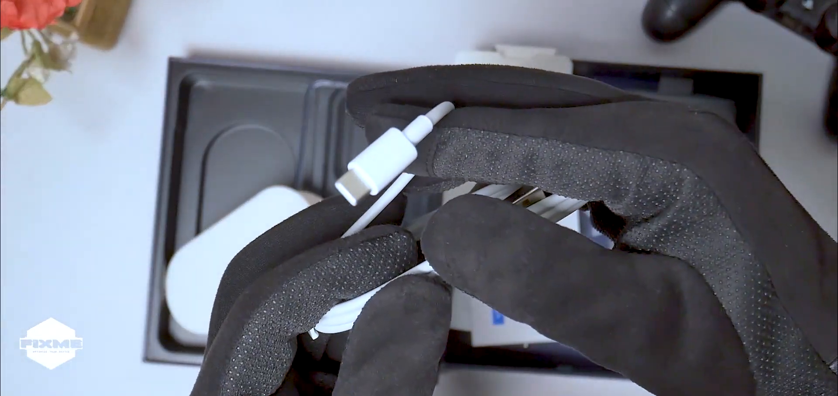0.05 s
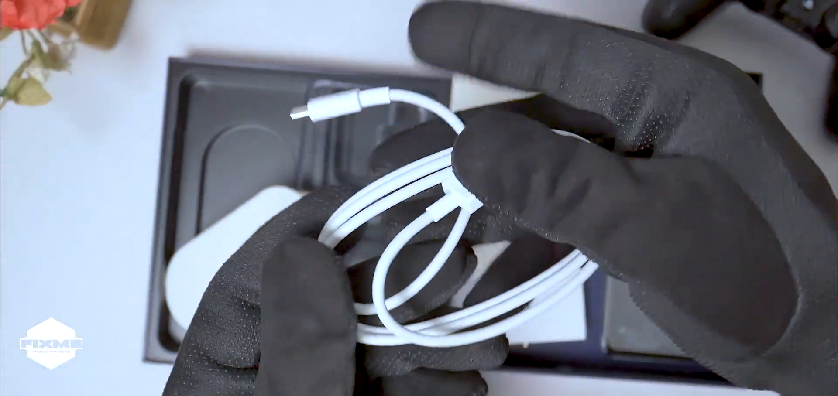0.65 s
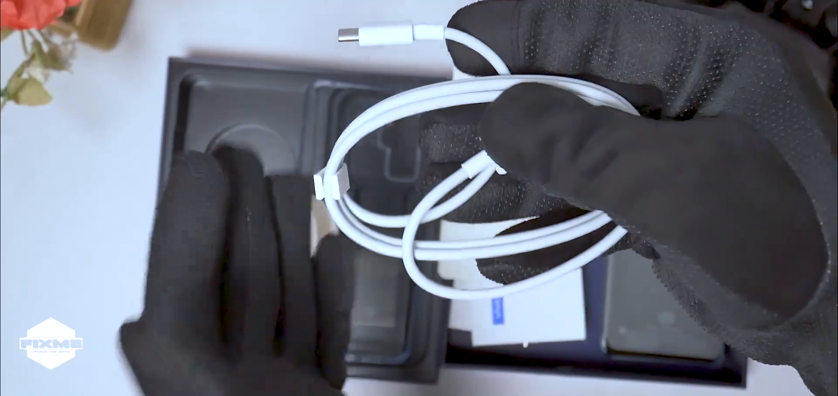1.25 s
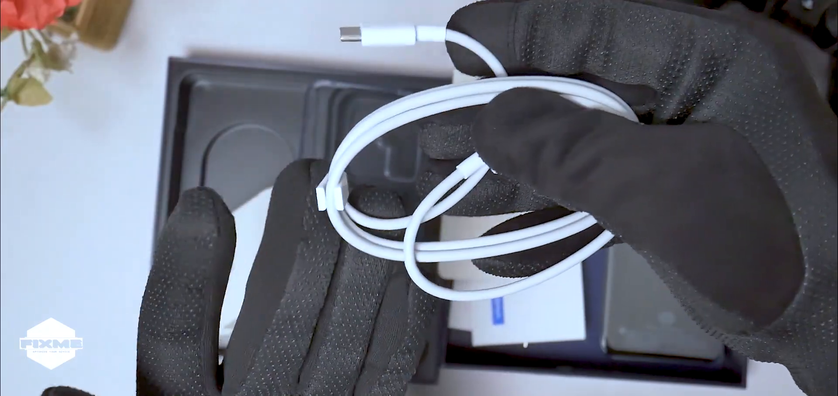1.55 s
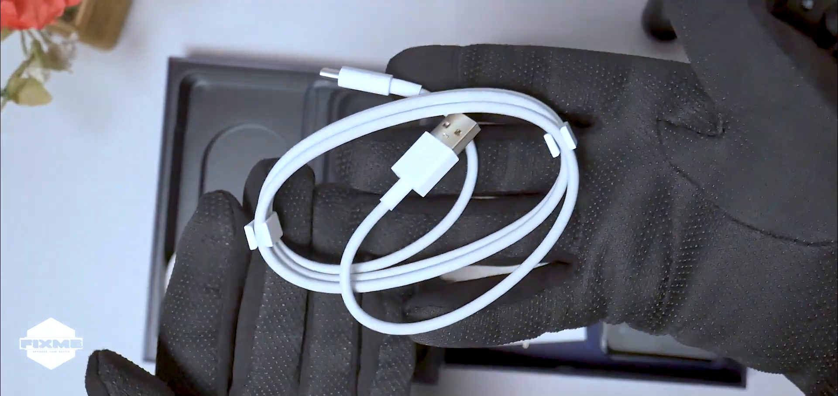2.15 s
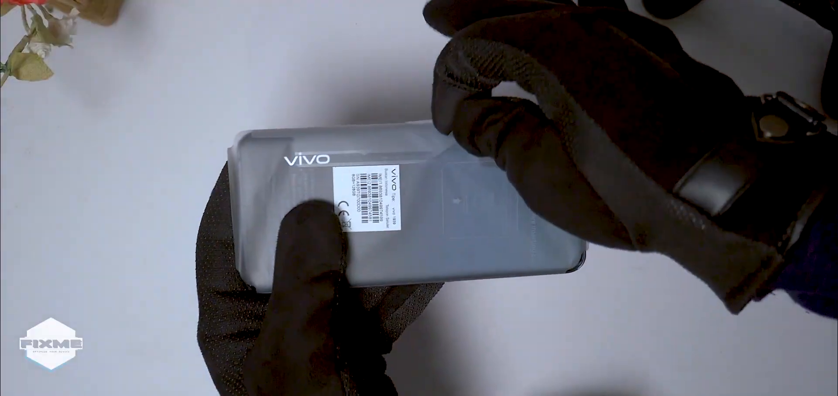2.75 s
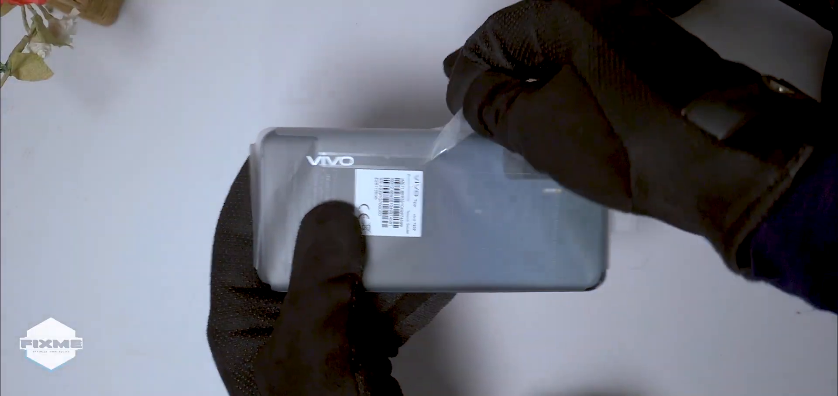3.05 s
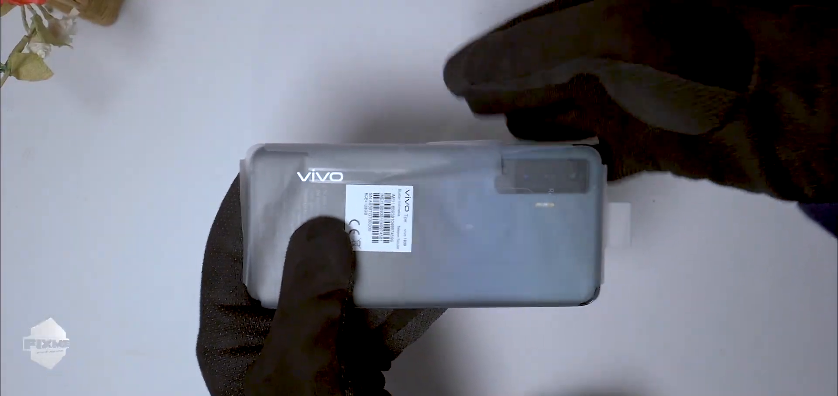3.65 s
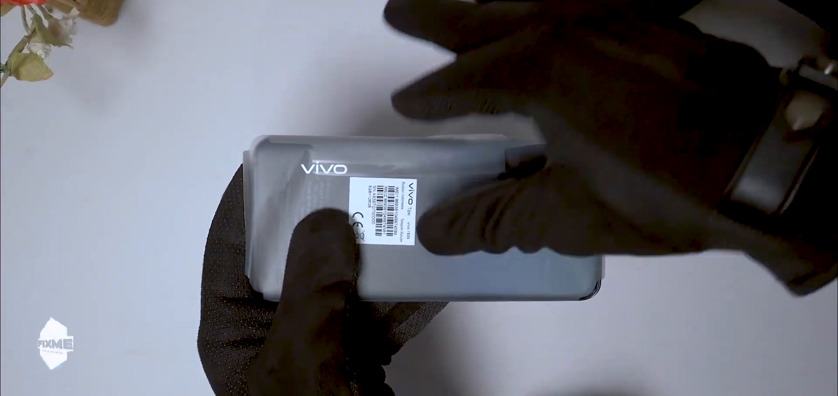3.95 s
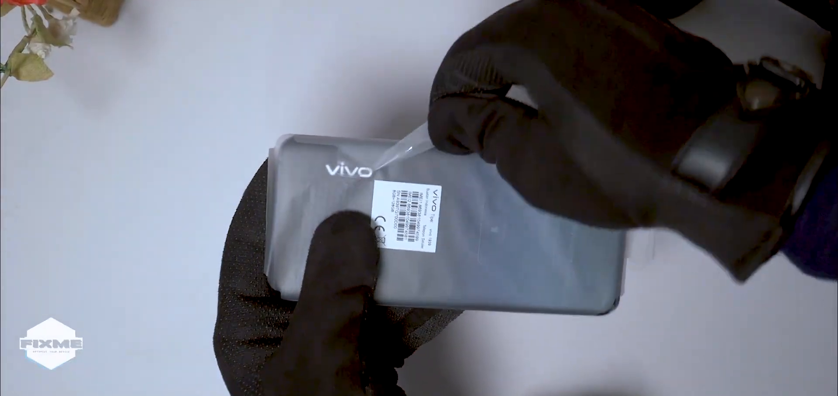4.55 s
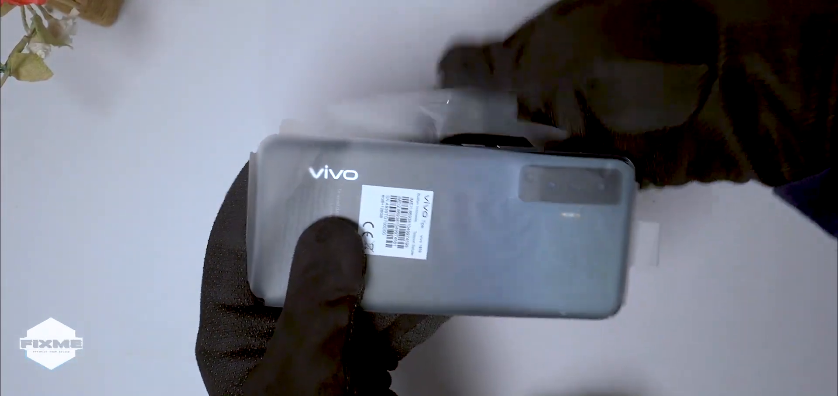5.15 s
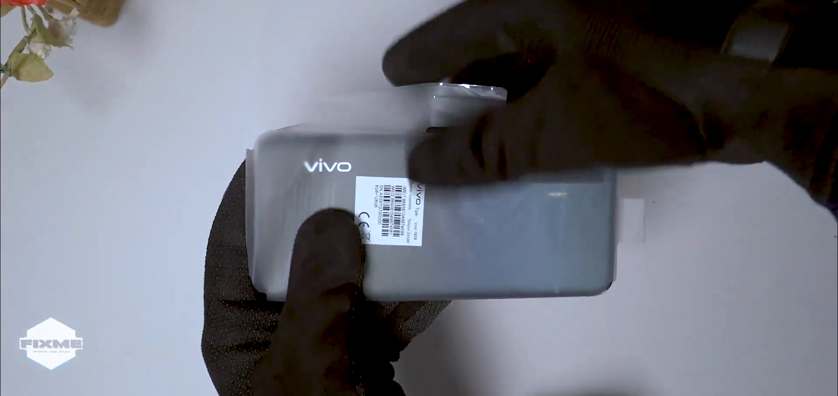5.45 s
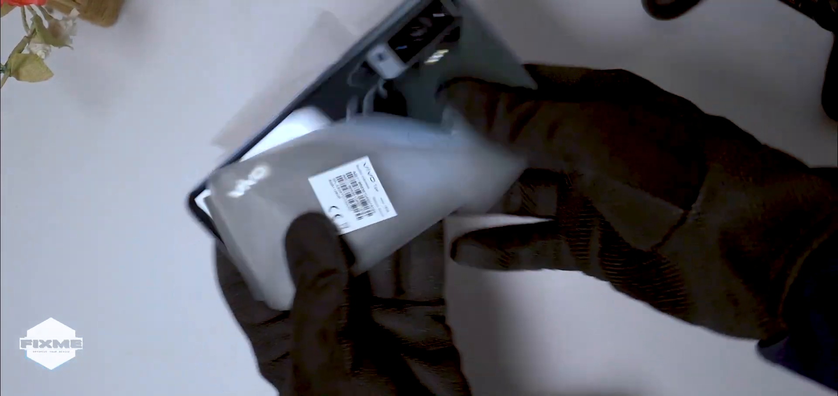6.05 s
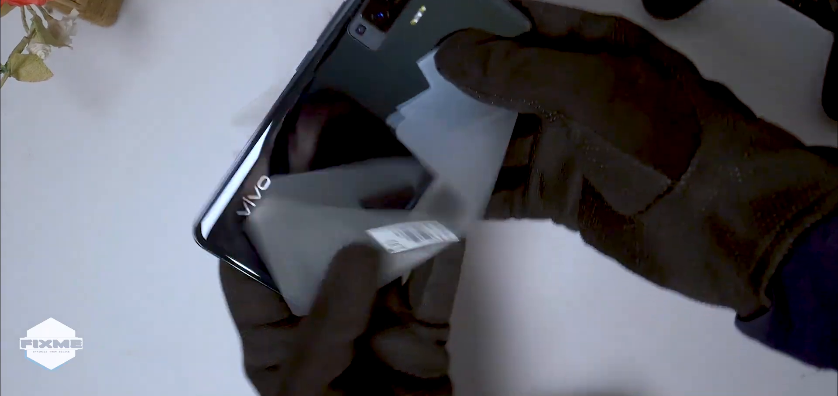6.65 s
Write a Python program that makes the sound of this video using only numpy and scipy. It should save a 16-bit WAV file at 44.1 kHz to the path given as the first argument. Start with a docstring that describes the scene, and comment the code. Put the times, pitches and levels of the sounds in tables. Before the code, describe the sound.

Gloved hands softly handle a cable, then peel thin plastic film off a phone with close crinkles, sharp crackles and dull knocks.

```python
"""Peeling plastic wrap off a device

Close to the microphone, gloved hands turn a coiled cable over a desk, then peel a thin film off a device.
The film comes away in tugs that swell, rustle and fade, and its creases buckle in very short snaps.
The device knocks dully in the grip, and the desk bounces each snap straight back.
Behind it all lies a small, quiet room with a low hum."""
import sys
import numpy as np
from scipy import signal
from scipy.fft import rfft, irfft
from scipy.io import wavfile
from scipy.ndimage import uniform_filter1d, minimum_filter1d

SR = 44100
rng = np.random.default_rng(int(sys.argv[2]) if len(sys.argv) > 2 else 0)


def master(y):
    """Save y as 16-bit WAV."""
    cut = np.clip(np.atleast_2d(y).T, -1, 1)
    pcm = np.round(cut * 32767)  # scale
    wavfile.write(sys.argv[1], SR, pcm.astype(np.int16))


N = 304731
TIME = np.arange(N) / SR

# All levels in the tables are relative: the functions turn them up or down further.
# The tone of each noise. Each row: frequency in Hz, level in dB.
ROOM_SPECTRUM = [(15, -57), (25, -36), (44, -16), (66, -3), (87, -14), (145, -1), (190, -13), (229, -10),
                 (344, -19), (439, -20.5), (863, -29.5), (2220, -33.5), (2840, -38.5), (11000, -43.5),
                 (16000, -55)]
GLOVE_SPECTRUM = [(150, -2.5), (500, -2), (1200, -11.5), (2050, -0.5), (2900, -2), (4300, -0.5), (5300, -9),
                  (7500, -8), (11000, -6), (16000, -9.5)]
GRIP_SPECTRUM = [(35, -34), (90, -3.5), (240, -6), (400, -7.5), (750, -14), (1400, -20), (4000, -40.5)]
RUSTLE_SPECTRUM = [(200, -39), (600, -4), (1000, -8.5), (1900, -0.5), (2800, -2.5), (4200, -1), (6000, -14),
                   (12000, -45)]
HISS_SPECTRUM = [(1500, -28.5), (3500, -12), (5200, -8), (8000, -4), (12500, -1.5), (16000, -3)]
# How alike left and right are. Each row: frequency in Hz, likeness from 0 (unrelated) to 1 (the same).
ROOM_TONE_LIKENESS = [(40, 0.8), (120, 0.8), (300, 0.4), (700, 0.22), (3000, 0.2), (7000, 0), (15000, .2)]
CLOSE_LIKENESS = [(50, 0.8), (250, 0.92), (700, 0.92), (3000, 1), (5000, 0.8), (7500, 0.06), (15000, 1)]
# How long the room rings. Each row: frequency in Hz, seconds to fade by 60 dB.
ROOM_DECAY = [(200, 0.47), (1000, 0.15), (4000, 0.21), (14000, 0.098)]
# A deep tone swells and fades. Each row: time in seconds, level in dB.
DRONE_LEVELS = [(1.0, -84), (1.5, -78), (1.95, -69), (2.28, -70), (2.42, -84)]
# Gloves stroke the cable. Each row: middle in seconds, length in seconds, level in dB.
GLOVE_STROKES = [(0.378, 0.12, -61.5), (0.599, 0.12, -64.5), (0.865, 0.13, -62.5), (0.96, 0.11, -64.5),
                 (1.057, 0.065, -64), (1.214, 0.072, -65), (1.283, 0.033, -62.5), (1.461, 0.087, -67.5),
                 (1.528, 0.044, -67.5), (1.808, 0.12, -65), (1.912, 0.11, -67), (2.028, 0.036, -71.5),
                 (2.067, 0.03, -70), (2.456, 0.41, -77)]
# Soft taps of cable and fingers. Each row: start in seconds, level in dB, pitch in Hz.
CABLE_TAPS = [(0.39, -45.5, 824), (0.851, -35.5, 612), (1.056, -52, 480), (1.222, -58, 1460),
              (1.282, -46.5, 1970), (1.445, -53.5, 2030), (2.837, -47, 2270), (4.942, -39, 1040),
              (4.969, -48.5, 1370), (5.067, -52.5, 560), (6.113, -34, 920), (6.579, -37.5, 615)]
# The device shifts in the grip. Each row: middle in seconds, length in seconds, level in dB.
GRIP_RUBS = [(3.109, 0.058, -55.5), (3.613, 0.036, -60), (3.674, 0.027, -45.5), (4.612, 0.019, -55.5),
             (4.782, 0.066, -60.5), (4.879, 0.042, -43), (5.061, 0.031, -49.5), (5.129, 0.024, -51.5),
             (5.216, .06, -40), (5.596, 0.056, -44.5), (5.713, 0.081, -49.5), (5.988, 0.034, -49.5),
             (6.031, 0.039, -36.5), (6.088, 0.069, -43.5), (6.153, 0.022, -47), (6.203, 0.022, -43),
             (6.222, 0.016, -36.5), (6.253, 0.018, -48), (6.327, 0.03, -45.5), (6.369, 0.071, -45),
             (6.593, 0.023, -46.5), (6.806, 0.019, -45), (6.862, 0.026, -42)]
# Hollow bumps of the device and loose film. Each row: start in seconds, level in dB, pitch in Hz.
DEVICE_BUMPS = [(4.7273, -41, 193), (4.7409, -27.5, 226), (4.878, -53, 170), (4.926, -38, 201),
                (5.071, -36, 272), (5.197, -34.5, 210), (5.572, -30, 256), (5.59, -21, 228),
                (5.615, -32.5, 250), (5.681, -29, 336), (5.787, -35, 333), (5.955, -31.5, 222),
                (6.021, -26, 225), (6.108, -26, 290), (6.2203, -19.5, 228), (6.251, -31, 300),
                (6.363, -27.5, 226), (6.801, -21, 306), (6.857, -25, 240)]
# Stretched film slips over the edge of the casing.
# Each row: middle in seconds, length in seconds, ring level in dB, hiss level in dB, pitch in Hz.
FILM_RASPS = [(2.494, 0.18, -76.5, -74, 2770), (3.354, 0.21, -67, -66.5, 3000),
              (5.032, 0.014, -52.5, -63.5, 1550), (5.082, 0.021, -44, -38, 2570),
              (5.151, 0.05, -54, -52.5, 2520)]
# Film drags on the casing, harder once it hangs loose. Each row: time in seconds, level in dB.
FILM_DRAG = [(2.66, -87.5), (2.78, -77.5), (3.2, -69.5), (3.43, -81), (3.51, -91), (4.05, -81.5),
             (4.22, -79), (4.66, -68.5), (5.0, -79), (5.53, -86.5), (5.66, -69.5), (5.88, -67), (6.1, -65),
             (6.55, -59), (6.75, -54.5), (6.9, -53)]
# Tugs at the film. Each row: peak time in seconds, swell time in seconds, rustle in dB, hiss in dB.
FILM_TUGS = [(3.066, 0.056, -71.5, -57.5), (3.108, 0.03, -49, -44.5), (3.571, 0.028, -54, -56.5),
             (3.612, 0.017, -51, -50.5), (3.666, 0.047, -44.5, -42.5), (4.069, 0.0077, -62.5, -55.5),
             (4.16, 0.044, -55.5, -50), (4.256, 0.037, -52, -49.5), (4.323, 0.014, -58, -39.5),
             (4.394, 0.0038, -61, -41), (4.74, 0.0072, -46, -58.5), (4.852, 0.014, -40, -33),
             (4.931, 0.014, -54.5, -53.5), (5.04, 0.023, -55.5, -51), (5.168, .022, -42, -27.5),
             (5.214, 0.064, -34.5, -34.5), (5.568, .012, -46.5, -47.5), (5.596, 0.017, -40.5, -41.5),
             (5.69, 0.036, -51, -48), (5.744, 0.13, -47, -50.5), (5.787, 0.011, -61, -77),
             (5.924, 0.013, -54, -76), (6.021, 0.017, -33, -34), (6.091, 0.061, -41, -37.5),
             (6.156, 0.022, -42, -43.5), (6.2, .02, -51.5, -63), (6.222, 0.022, -45.5, -48.5),
             (6.254, 0.019, -53, -55.5), (6.314, .008, -46, -47.5), (6.38, 0.04, -52, -68),
             (6.677, 0.037, -47.5, -45), (6.799, 0.015, -46, -51), (6.865, 0.03, -48.5, -48)]
# Creases buckle. Each row: start in seconds, levels in dB of ring, tick, flex and air push, pitch in Hz.
CREASE_SNAPS = [(3.0816, -27, -34, -33, -45, 2760), (3.0853, -46, -35, -47, -70, 4600),
                (3.184, -71, -56, -73, -85, 5500), (3.4519, -45.5, -37.5, -84, -58, 3100),
                (3.5313, -42, -52, -68, -74, 2800), (3.572, -37, -40.5, -73, -55, 2420),
                (3.6692, -35.5, -28, -41.5, -61, 2550), (3.683, -34.5, -30, -38, -57, 4080),
                (4.2304, -50.5, -54, -62, -70, 1840), (4.251, -29, -35, -80, -86, 4050),
                (4.2655, -40.5, -42, -58, -81, 3760), (4.3114, -42, -31.5, -43, -72, 3800),
                (4.313, -31.5, -50, -77, -67, 3300), (4.3178, -38, -33, -44.5, -70, 4330),
                (4.331, -35, -37.5, -76, -84, 3900), (4.3457, -29.5, -32, -49.5, -69, 4100),
                (4.3558, -42, -30, -59, -77, 4060), (4.3902, -35.5, -19.5, -44.5, -57, 3800),
                (4.61, -48.5, -46, -56.5, -50, 5100), (4.727, -45, -38.5, -42.5, -49, 2550),
                (4.7383, -41.5, -40, -47, -56, 4740), (4.745, -30.5, -22, -40, -55, 3500),
                (4.8298, -35.5, -29, -53, -82, 3220), (4.85, -18.5, -10.5, -21, -27, 2670),
                (4.8612, -48, -31, -32, -39.5, 2700), (4.881, -34.5, -37, -38, -42.5, 3280),
                (4.9251, -41, -36, -38.5, -43.5, 3080), (5.0185, -37.5, -53.5, -47, -54, 2080),
                (5.1253, -42.5, -32.5, -46, -46.5, 2600), (5.1625, -35.5, -30.5, -45.5, -45, 2370),
                (5.183, -46, -28, -37, -46, 3560), (5.189, -30.5, -16.5, -39, -40, 4640),
                (5.2, -38.5, -30.5, -48, -34.5, 3270), (5.221, -36, -33, -36.5, -34.5, 2680),
                (5.2344, -40.5, -38.5, -44.5, -58, 3800), (5.2838, -49, -45.5, -58, -54, 3660),
                (5.31, -61, -53.5, -73.5, -82.5, 5030), (5.566, -52, -46.5, -44, -62, 2770),
                (5.5921, -40.5, -44, -46, -39, 2850), (5.601, -31, -33.5, -41, -61, 3340),
                (5.617, -51, -47, -42, -65, 2680), (5.676, -49, -39.5, -69, -52, 2900),
                (5.6954, -44, -51, -45, -52, 2280), (5.7032, -54, -42.5, -55, -70, 4570),
                (5.787, -55.5, -48.5, -43.5, -51, 2740), (5.8174, -52, -57, -55, -53, 3320),
                (5.924, -48.5, -57, -64, -53, 3080), (5.953, -52.5, -57.5, -51.5, -57.5, 2840),
                (6.02, -34.5, -30, -54, -48, 2120), (6.0242, -27.5, -33, -33.5, -53, 2770),
                (6.0801, -41, -36.5, -43, -36, 2800), (6.094, -36, -38, -37, -47, 3100),
                (6.1522, -38.5, -32.5, -45, -43, 3000), (6.22, -34, -33, -43, -38, 2170),
                (6.2479, -42, -43, -43.5, -38, 4050), (6.2769, -46.5, -39.5, -43, -57, 3500),
                (6.3089, -40.5, -37.5, -55, -53, 2080), (6.3108, -41, -31.5, -44.5, -56, 2100),
                (6.385, -48, -48, -50, -64, 2230), (6.409, -52, -44, -64, -60, 4330),
                (6.4263, -49, -54, -59, -51, 2900), (6.5581, -49.5, -50, -45, -64, 2140),
                (6.6425, -39.5, -40.5, -45, -52, 3630), (6.6686, -40.5, -35.5, -45, -48, 3650),
                (6.675, -40.5, -55, -56, -53, 3500), (6.805, -60, -50, -39, -50, 2420),
                (6.835, -46, -66, -50, -47, 3800)]
# How well the microphone hears each pitch. Each row: frequency in Hz, gain in dB.
MIC_RESPONSE = [(1000, 0), (1400, -0.5), (2700, 0), (4000, -1.5), (6000, 3.5), (10000, 1), (13000, -1),
                (15500, -3), (16500, -18)]
# How far the left channel runs ahead of the right. Each row: frequency in Hz, phase in radians.
LEFT_PHASE_LEAD = [(4000, 0.23), (6500, 0.1), (8500, 1.7), (11500, 1), (14000, 2.1)]


def amp(db):
    """Turns decibels into a gain to multiply by."""
    return 10 ** (np.asarray(db) / 20)


def unit(x):
    """Scales a signal so its average strength (rms) is 1."""
    return x / np.sqrt(np.mean(x ** 2) + 1e-20)


def read(points, hz):
    """Looks up a table by frequency, gliding between its rows on a log scale."""
    row_hz, value = np.transpose(points)
    return np.interp(np.log(hz + 1), np.log(row_hz + 1), value)


def level(rows):
    """Gain over time from a table; silent outside it, unless it runs to the end of the scene."""
    times, db = np.transpose(rows)
    after_db = db[-1] if times[-1] > TIME[-1] - .1 else -120
    return amp(np.interp(TIME, times, db, left=-120, right=after_db))


def arch(middle_s, length_s, edge_db=-9, firmness=2):
    """A smooth rise and fall that passes edge_db at both ends; firmer means steeper edges."""
    distance = abs(2 * (TIME - middle_s) / length_s)
    return amp(edge_db * np.minimum(distance ** firmness, 20))


def add(mix, start_s, sound):
    """Adds a sound to the mix at its start time."""
    part = mix[:, round(start_s * SR):][:, :sound.shape[-1]]
    part += sound[..., :part.shape[1]]


def highpass(x, edge_hz, order=2):
    """Turns down everything below edge_hz."""
    return signal.sosfilt(signal.butter(order, edge_hz, "high", fs=SR, output="sos"), x)


def flatten(burst, share=0.7):
    """Evens out the chance peaks and dips in the spectrum of a short burst."""
    spectrum = rfft(burst)
    return irfft(spectrum / (abs(spectrum) + 1e-9) ** share)


def stereo(left, other, likeness):
    """Makes left and right from two unrelated signals; the right borrows some of the left."""
    return np.array([left, likeness * left + np.sqrt(1 - likeness ** 2) * other])


def colour(pair, spectrum, likeness=CLOSE_LIKENESS):
    """Gives a pair of noises a tone and a stereo width."""
    hz = np.fft.rfftfreq(N, 1 / SR)
    channels = stereo(*rfft(pair), read(likeness, hz))
    return unit(irfft(channels * amp(read(spectrum, hz)), N))


def kicks(per_s, spread_db, cap):
    """Spikes at random times, mostly small; the biggest are cap * spread_db above the smallest."""
    sizes = amp(spread_db * np.minimum(rng.exponential(1, N), cap))
    return sizes * (rng.random(N) < per_s / SR)


def slips(per_s, spread_db, smooth, decay_s):
    """The flickering strength of rubbing: tiny uneven slips on top of a smooth share."""
    fade = np.exp(-2 / (decay_s * SR))
    power = signal.lfilter([1], [1, -fade], kicks(per_s, spread_db, cap=4) ** 2)
    return np.sqrt(smooth + (1 - smooth) * power / power.mean())


def friction(grain, spectrum, patchy_db):
    """Noise let out by the slips; its tone keeps shifting as the point of contact moves."""
    bands = signal.stft(rng.standard_normal((2, N)), nperseg=512)[2]
    patches = uniform_filter1d(rng.standard_normal(bands.shape[1:]), size=9, axis=0)  # blur over pitch
    patches = unit(uniform_filter1d(patches, size=5, axis=1))  # blur over time
    noise = signal.istft(bands * amp(patchy_db * patches), nperseg=512)[1][:, :N]
    return colour(grain * noise, spectrum)


def room_tone(rumble_db=-67.5, hum_hz=150, hum_width_hz=26, hum_db=-69.5):
    """Steady rumble and faint hiss, with one low note of the room humming in it."""
    resonance = signal.iirpeak(hum_hz, hum_hz / hum_width_hz, fs=SR)
    hum = signal.lfilter(*resonance, rng.standard_normal(N))
    hum = signal.sosfilt(signal.butter(2, 2 * hum_hz, fs=SR, output="sos"), hum)
    rumble = colour(rng.standard_normal((2, N)), ROOM_SPECTRUM, ROOM_TONE_LIKENESS)
    return amp(rumble_db) * rumble + amp(hum_db) * unit(hum)


def drone(pitch_hz=57.6, waver_hz=1.0):
    """A faint deep tone that wavers a little."""
    waver = unit(uniform_filter1d(rng.standard_normal(N), SR // 5))
    cycles = np.cumsum(pitch_hz + waver_hz * waver) / SR
    return level(DRONE_LEVELS) * unit(np.sin(2 * np.pi * cycles))


def room_echo(sound, echo_db=-19, build_s=0.0079):
    """The room adds a weak wash of echoes, each pitch dying at its own speed."""
    hz, t, bands = signal.stft(rng.standard_normal((2, SR // 2)), SR, nperseg=256)
    bands = stereo(*bands, read(CLOSE_LIKENESS, hz)[:, None])
    fade = amp(-60 * t / read(ROOM_DECAY, hz)[:, None])
    tail = signal.istft(bands * fade, SR, nperseg=256)[1]
    tail *= np.minimum(np.arange(tail.shape[1]) / (build_s * SR), 1)
    return amp(echo_db) * signal.fftconvolve(sound, tail / np.linalg.norm(tail[0]), axes=1)[:, :N]


def gloves(hold_db=-85, hold_end_s=1.55):
    """Fabric scratches over the cable in firm strokes, and stirs faintly while the hands turn it."""
    grain = slips(per_s=450, spread_db=3.3, smooth=0.42, decay_s=.001)
    power = sum((amp(db) * arch(middle_s, length_s, edge_db=-7.5, firmness=1.5)) ** 2
                for middle_s, length_s, db in GLOVE_STROKES)
    power += amp(hold_db) ** 2 * (TIME < hold_end_s)
    return np.sqrt(power) * friction(grain, GLOVE_SPECTRUM, patchy_db=1.8)


def cable_taps(scuff_s=0.0041, scuff_gain=1.78, ring_cycles=4.8, ring_db=-8, clack_hz=2078, clack_db=-3):
    """Each tap is a short scuff, a ring and a plastic clack; high taps die sooner."""
    out, t = np.zeros((2, N)), np.arange(2000) / SR
    scuff_band = signal.butter(3, [500, 3200], "band", fs=SR, output="sos")
    swell = lambda length_s: t / length_s * np.exp(1 - 2 * t / length_s)
    for start_s, db, hz in CABLE_TAPS:
        scuff = signal.sosfilt(scuff_band, rng.standard_normal(len(t))) * swell(scuff_s)
        tones = np.sin(2 * np.pi * hz * t) + amp(clack_db) * np.sin(2 * np.pi * clack_hz * t)
        ring = tones * swell(ring_cycles / hz)
        add(out, start_s, amp(db) * (scuff_gain * scuff + amp(ring_db) * ring))
    return out


def grip_rubs(gain_db=-3, drag_db=-2):
    """The device rubs dully in the hands, when the grip shifts and while the film drags."""
    grain = slips(per_s=420, spread_db=1.2, smooth=0.35, decay_s=0.004)
    power = sum((amp(db) * arch(middle_s, length_s)) ** 2 for middle_s, length_s, db in GRIP_RUBS)
    power += (amp(drag_db) * level(FILM_DRAG)) ** 2
    return amp(gain_db) * np.sqrt(power) * friction(grain, GRIP_SPECTRUM, patchy_db=2.2)


def device_bumps(rise_s=0.0013, decay_s=0.0021, upper_ratio=1.6, upper_db=-6, low_hz=90):
    """Each bump rings two low notes that die at once; the small body gives off no deep bass."""
    out, t = np.zeros((2, N)), np.arange(3000) / SR
    envelope = (1 - np.exp(-t / rise_s)) * np.exp(-t / decay_s)
    for start_s, db, hz in DEVICE_BUMPS:
        lower = np.sin(2 * np.pi * hz * t)
        upper = amp(upper_db) * np.sin(2 * np.pi * (hz * upper_ratio * t + rng.random()))
        add(out, start_s, amp(db) * highpass((lower + upper) * envelope, low_hz))
    return out


def film_rasps(damping_hz=1600):
    """Fast, even slips make the tight film ring around one pitch and hiss until the slipping stops."""
    grain = slips(per_s=800, spread_db=1.5, smooth=0.42, decay_s=.001)
    drive = grain * rng.standard_normal(N)
    hiss = friction(grain, HISS_SPECTRUM, patchy_db=1.5)
    out = np.zeros((2, N))
    for middle_s, length_s, ring_db, hiss_db, hz in FILM_RASPS:
        pole = np.exp(np.pi * (2j * hz - damping_hz) / SR)
        ring = unit(signal.lfilter([1], np.poly([pole] * 3), drive).real)  # three resonators in a row
        out += arch(middle_s, length_s) * (amp(ring_db) * ring + amp(hiss_db) * hiss)
    return out


def crackle(low_hz=1500, high_hz=6000, pitches=16, ring_s=0.00015):
    """Small creases of many pitches flip at random, a few much louder than the rest."""
    flips = kicks(per_s=480, spread_db=3.5, cap=3)
    crease = rng.integers(0, pitches, N)
    out, t = np.zeros(N), np.arange(256) / SR
    for k, hz in enumerate(np.geomspace(low_hz, high_hz, pitches)):
        ring = np.sin(2 * np.pi * hz * t) * t * np.exp(-2 * t / ring_s)
        out += signal.oaconvolve(flips * (crease == k), ring)[:N]
    return unit(out)


def tugs(swell_db=20, fade_db_per_s=340):
    """Gains of rustle and hiss over time: each tug swells at its own pace, and all fade equally fast."""
    power = np.zeros((2, N))
    for peak_s, swell_s, rustle_db, hiss_db in FILM_TUGS:
        near = abs(TIME - peak_s) < .5
        t = TIME[near] - peak_s
        shape = amp(np.minimum(swell_db * t / swell_s, -fade_db_per_s * t))
        power[:, near] += np.outer(amp([rustle_db, hiss_db]), shape) ** 2
    return np.sqrt(power)


def peeling(rustle_db=-2.5, hiss_db=-0.5, crackle_db=-50, half_pull_db=-54, pivot_db=-63):
    """Film drags over the casing: a smooth hiss when slow, grainy and crackling when pulled harder."""
    tug_rustle, tug_hiss = tugs()
    drag = level(FILM_DRAG)
    drag_hiss = amp(pivot_db) * (drag / amp(pivot_db)) ** 0.7  # hiss grows more slowly than rustle
    rustle_gain, hiss_gain = np.hypot(tug_rustle, drag), np.hypot(tug_hiss, drag_hiss)
    pull = rustle_gain / (rustle_gain + amp(half_pull_db))  # 0 at rest, near 1 in a hard tug
    grain = slips(per_s=800, spread_db=4.2, smooth=1 - 0.94 * pull, decay_s=0.0004)
    rustle = rustle_gain * friction(grain, RUSTLE_SPECTRUM, patchy_db=2.6)
    hiss = hiss_gain * friction(grain, HISS_SPECTRUM, patchy_db=1.8)
    return amp(rustle_db) * rustle + amp(hiss_db) * hiss + amp(crackle_db) * pull ** 2 * crackle()


def shiver_and_bounce(sound, shiver_db=-8, shiver_s=0.0028, bounce_db=-13, bounce_s=0.0012):
    """After a snap the loose film shivers for a moment, and the desk bounces the sound back."""
    t = np.arange(700) / SR
    shiver = rng.standard_normal((3, len(t))) * np.exp(-t / shiver_s)
    side_treble = np.diff(shiver[1:], axis=1, prepend=0)  # different on the left and right
    path = amp(shiver_db) * unit(shiver[0] + 0.62 * side_treble) / np.sqrt(len(t))
    path[:, 0] = 1  # the direct sound
    path[:, round(bounce_s * SR * rng.uniform(.8, 1.2))] += amp(bounce_db)
    return signal.fftconvolve(sound, path, axes=1)


def snap(ring_db, tick_db, flex_db, push_db, hz, tick_s=0.00016, level_window_s=0.004):
    """One crease flips: a tiny ring, a bright tick, a lower flex of the film and a push of air."""
    t = np.arange(512) / SR
    at_level = lambda x, db: amp(db) * unit(x) * np.sqrt(level_window_s * SR / len(t))
    ping = lambda pitch_hz, decay_s: np.sin(2 * np.pi * pitch_hz * t) * np.exp(-t / decay_s)
    ring = highpass(t * ping(hz, decay_s=0.00017), 1300)
    flex = highpass(ping(1350 * rng.uniform(0.56, 1.91), decay_s=0.00051), 800)
    burst = rng.standard_normal((3, len(t))) * (1 - np.exp(-t * hz * 2)) * np.exp(-t / tick_s)
    grit = flatten(burst) * np.exp(-t / (4 * tick_s))
    edge_hz = np.clip(6200 * 2 ** ((tick_db + 34) / 45), 3000, 12000)  # harder ticks are brighter
    tick = highpass(grit[0] + 0.38 * grit[1:], edge_hz)  # short waves reach each side differently
    push = highpass(ping(470 * rng.uniform(0.54, 2.1), decay_s=0.0007), 260, order=3)
    body = at_level(ring, ring_db) + at_level(flex, flex_db) + at_level(push, push_db)
    return rng.choice([-1, 1]) * body + at_level(tick, tick_db)


def buckling_creases(gain_db=-0.5, second_db=-6, thin_db=-5, gap_s=0.0015):
    """Each crease gives way in two quick steps; the second is weaker and thinner."""
    out = np.zeros((2, N))
    for start_s, ring_db, tick_db, flex_db, push_db, hz in CREASE_SNAPS:
        first = snap(ring_db, tick_db, flex_db, push_db, hz)
        add(out, start_s, shiver_and_bounce(first))
        second = snap(ring_db + thin_db, tick_db, flex_db + thin_db, push_db + thin_db, hz)
        add(out, start_s + gap_s * rng.uniform(0.76, 1.3), amp(second_db) * shiver_and_bounce(second))
    return amp(gain_db) * out


def scene():
    """The film, the device and the gloved hands, together in the room."""
    film = buckling_creases() + peeling() + film_rasps()
    close = film + grip_rubs() + device_bumps() + gloves() + cable_taps()
    return close + room_echo(close) + room_tone() + drone()


def record(dry, balance_db=-0.12, top_hz=16500):
    """The microphone's two sides hear the treble out of step; big peaks and the very top are cut back."""
    hz = np.fft.rfftfreq(N, 1 / SR)
    half_lead = np.exp(.5j * read(LEFT_PHASE_LEAD, hz))
    sides = np.array([half_lead * amp(balance_db), amp(-balance_db) / half_lead])
    heard = irfft(rfft(dry) * amp(read(MIC_RESPONSE, hz)) * sides, N)
    # A limiter turns the gain down for a few milliseconds around any peak above full scale.
    safe_gain = minimum_filter1d(1 / np.maximum(abs(heard).max(0), 1), size=101)
    limited = heard * uniform_filter1d(safe_gain, size=101)
    lowpass = signal.firwin(255, top_hz, window=("kaiser", 8), fs=SR)
    return signal.oaconvolve(limited, lowpass[None], "same")


dry = scene()
out = record(dry)
master(out)
```